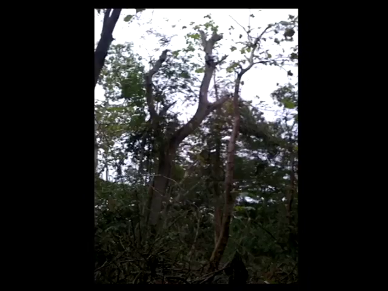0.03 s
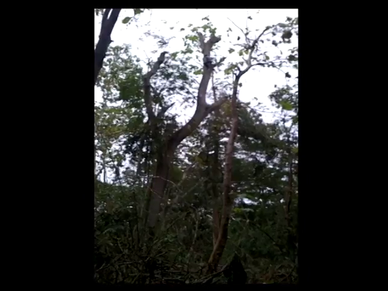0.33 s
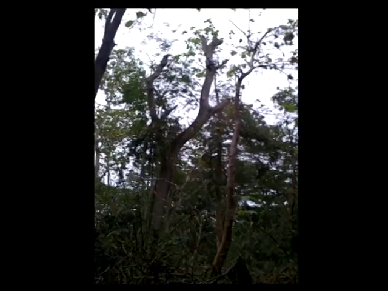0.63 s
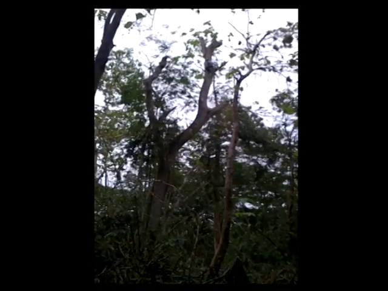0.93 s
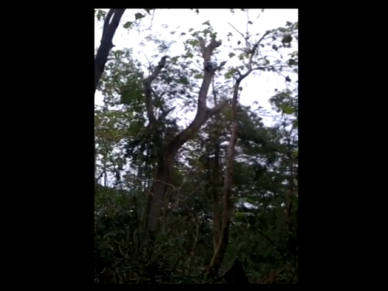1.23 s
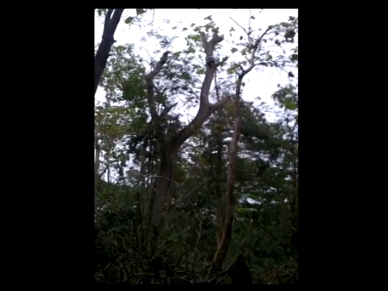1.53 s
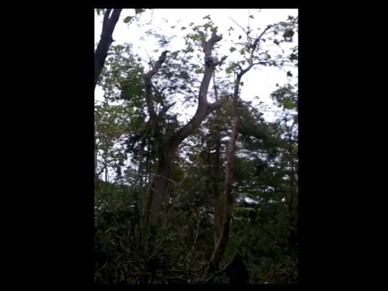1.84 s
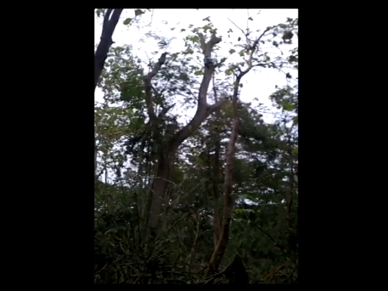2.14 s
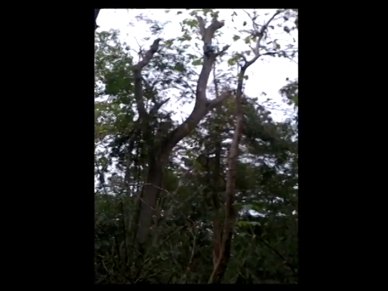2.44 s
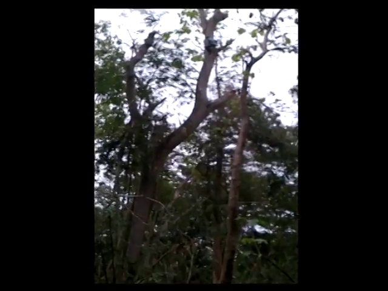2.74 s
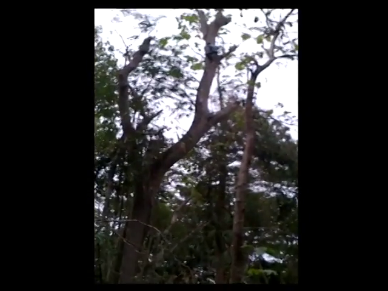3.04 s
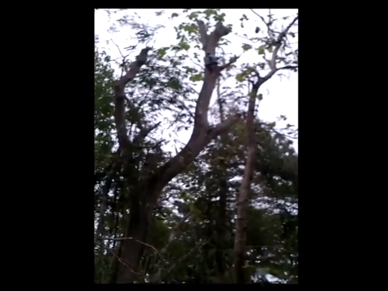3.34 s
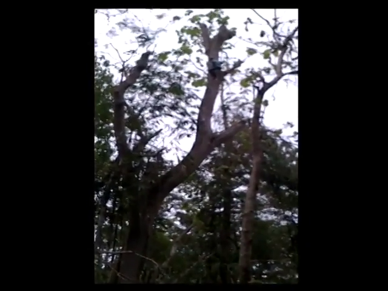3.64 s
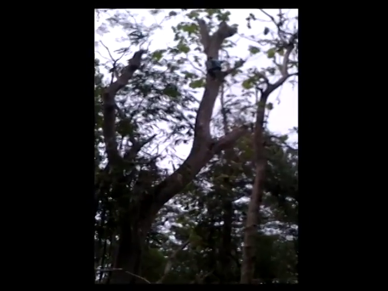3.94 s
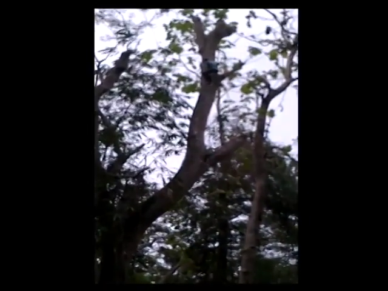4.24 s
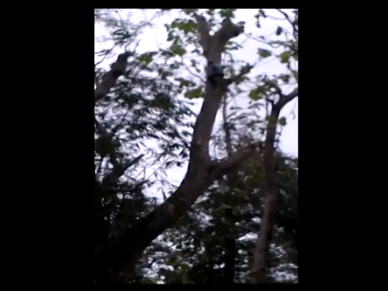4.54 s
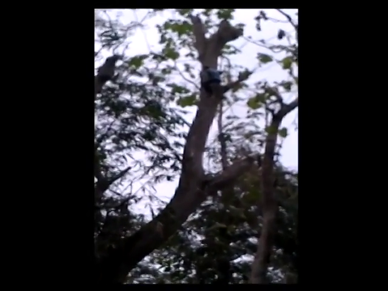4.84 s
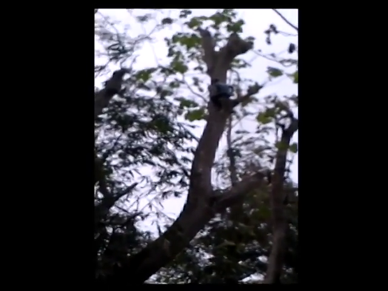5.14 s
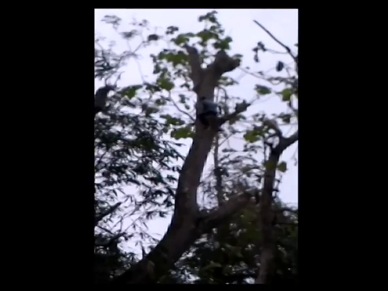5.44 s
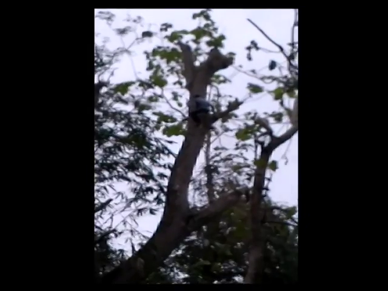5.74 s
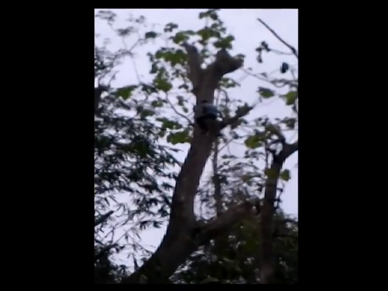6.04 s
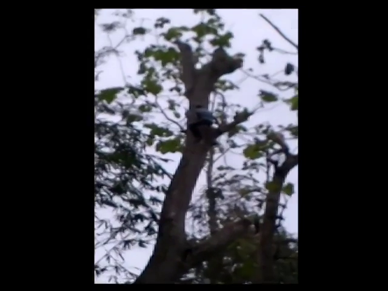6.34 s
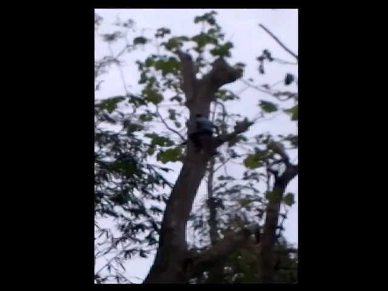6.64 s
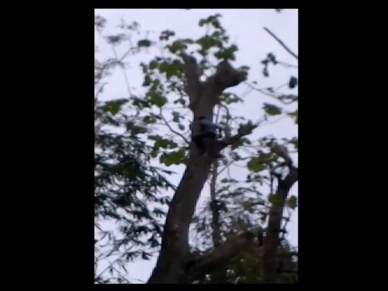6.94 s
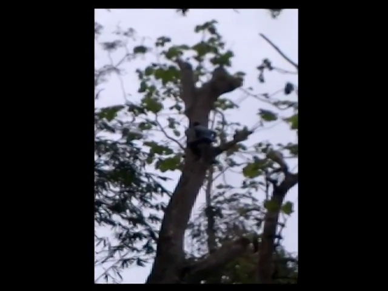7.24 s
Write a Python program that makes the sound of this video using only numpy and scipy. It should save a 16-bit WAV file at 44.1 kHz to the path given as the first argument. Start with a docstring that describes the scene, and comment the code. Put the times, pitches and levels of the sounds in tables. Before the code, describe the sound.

A two-stroke chainsaw works on a high limb, heard from the ground among tall trees. It starts suddenly with a bright buzz that rises in pitch. As the chain bites, the roar dies away and the engine sinks to a duller, wavering drone. It then gradually regains speed, with a thin whine and the hiss of the chain in the wood. The trunks add a short, soft echo.

```python
"""Chainsaw up in a tree

A two-stroke chainsaw cuts a high limb, heard from the ground among tall trees. It buzzes brightly
at full throttle, bogs down to a dull drone as the chain bites, then slowly regains speed. Every
firing barks through the muffler, the chain hisses in the cut, and trunks scatter the sound."""
import sys
import numpy as np
from scipy import signal
from scipy.fft import rfft, irfft, next_fast_len
from scipy.io import wavfile
from scipy.ndimage import uniform_filter1d, map_coordinates

SR = 44100
rng = np.random.default_rng(int(sys.argv[2]) if len(sys.argv) > 2 else 0)


def bounce(signal):
    """Save signal as a 16-bit WAV file at the path given by the first command-line argument."""
    frames = np.transpose(np.atleast_2d(signal))
    limited = np.clip(frames, -1, 1)
    pcm = np.round(limited * 32767).astype(np.int16)
    wavfile.write(sys.argv[1], SR, pcm)


N = 325899
TIME = np.arange(N) / SR


def amp(db):
    """Turn decibels into a number to multiply by."""
    return 10 ** (np.asarray(db) / 20)


def unit(x):
    """Scale x to an average power of 1."""
    return x / np.sqrt(np.mean(x ** 2) + 1e-20)


def levelled(x, size=3500):
    """Even out x so that its power stays near 1."""
    power = uniform_filter1d(uniform_filter1d(x ** 2, size), size)
    return x / np.sqrt(np.abs(power) + 1e-12)


def along(points, hz):
    """Look up a table by frequency, with octaves evenly spaced."""
    f, v = np.transpose(points)
    return np.interp(np.log(hz + 1), np.log(f + 1), v)


def curve(points):
    """Join a table's points in time, giving one value per sample."""
    return np.interp(TIME, *np.transpose(points))


def chance(clock):
    """A smooth random curve with a new value at every whole step of the clock."""
    return map_coordinates(rng.standard_normal(4096), [clock], mode="mirror")


def filtered(x, response):
    """Multiply each frequency in x by response(hz)."""
    size = next_fast_len(N + SR // 2)
    hz = np.fft.rfftfreq(size, 1 / SR)
    return irfft(rfft(x, size) * response(hz), size)[:N]


def coloured(x, spectrum):
    """Give x the tone colour in a table, at power 1."""
    return unit(filtered(x, lambda hz: amp(along(spectrum, hz))))


def peak(hz, centre, width):
    """How well hz fits a resonance, a pitch at which a part likes to ring: 1 at best."""
    return 1 / (1 + (2 * (hz - centre) / width) ** 2)


def gas(turns, depth):
    """Rushing noise that swells each time the exhaust port opens."""
    return unit(rng.standard_normal(N) * np.exp(depth * np.cos(2 * np.pi * turns)))


def firings(turns, jitter, scatter_db, count=34):
    """One sharp pulse per engine turn, without its bass, each a little off in time and size."""
    phase = 2 * np.pi * (turns + jitter * chance(turns))
    pulses = sum(np.cos(k * phase) for k in range(5, count))
    return unit(pulses * amp(scatter_db * chance(turns)))


# tone colour of the moving air: f/Hz, level/dB
AIR_COLOUR = [(20, -21), (40, -1), (70, 5), (110, 1), (250, 3), (500, 1.5), (900, 2), (1500, -13),
              (4000, -34)]
def air(revs):
    """A soft rush of air lies under the engine and grows with its speed."""
    level_db = -48.5 + 2 * chance(TIME * 5)
    return np.sqrt(revs) * amp(level_db) * coloured(rng.standard_normal(N), AIR_COLOUR)


# time the forest's echo takes to fade by 60 dB: f/Hz, t/s
ECHO_FADE = [(150, .25), (1000, 0.42), (4000, 0.52), (12000, 0.16)]
def among_trees(x, wet_db):
    """Trunks and leaves add a soft echo, wet_db louder than x; the mix has power 1."""
    hz, t, noise = signal.stft(rng.standard_normal(SR // 2), SR, nperseg=256)
    fade = amp(-60 * t / along(ECHO_FADE, hz)[:, None])
    _, tail = signal.istft(noise * fade, SR, nperseg=256)
    echo = signal.fftconvolve(x, np.pad(tail, (SR // 200, 0)))[:N]  # 5 ms late
    return unit(unit(x) + amp(wet_db) * unit(echo))


def off_limbs(x, echo_db, count=8):
    """Quick, weak echoes from nearby limbs make a hiss metallic."""
    delays = rng.integers(SR // 1000, SR // 80, count)
    return unit(x + amp(echo_db) * sum(np.roll(x, d) for d in delays))


# loudness of the running chain: t/s, level/dB
SIZZLE_LEVEL = [(0.6, -45), (1.8, -38.5), (2.5, -42.5), (3.7, -47), (4.75, -44), (5.4, -48.5),
                (6.65, -41.5), (7.39, -45)]
# its tone colour: f/Hz, level/dB
SIZZLE_COLOUR = [(1500, -9.5), (3400, -5), (4700, -8.5), (6000, -0.5), (7300, 2), (8500, -3.5),
                 (10200, -8.5), (11400, -10), (12600, -17.5), (14200, -28)]
def chain_sizzle(turns):
    """The links sizzle as they run round the bar, brighter when louder."""
    level_db = curve(SIZZLE_LEVEL)
    sizzle = coloured(gas(turns, depth=0.07) * amp(0.78 * chance(TIME * 200)), SIZZLE_COLOUR)
    treble = filtered(sizzle, lambda hz: np.interp(hz, [8500, 10500], [0, 1]))
    treble_db = 0.83 * (level_db - level_db.mean())
    sizzle += treble * (amp(treble_db) - 1)
    return amp(level_db) * off_limbs(sizzle, echo_db=-21.5)


# how the hiss of the cut rises and falls: t/s, level/dB
CUT_LEVEL = [(2.1, -32.5), (2.5, -55), (3.7, -54.5), (4.65, -43.5), (5.55, -45.5), (6.6, -39), (7.39, -43)]
# its tone colour: f/Hz, level/dB
CUT_COLOUR = [(1500, -5), (3200, -21.5), (3650, -15.5), (3900, -0.5), (4700, -1.5), (5300, -4), (5900, -1),
              (6500, -1), (7200, -24.5), (9000, -16), (14000, -52)]
def wood_cut(turns):
    """The chain's teeth tear the wood in time with the engine."""
    fade_in = np.interp(TIME, [2.0, 2.5], [0, 1])
    teeth = among_trees(firings(turns, jitter=0.0018, scatter_db=6.5, count=42), wet_db=24)
    hiss = gas(turns, depth=0.07) * amp(1.5 * chance(TIME * 250))
    cut = coloured(hiss + amp(-14.5) * teeth, CUT_COLOUR)
    return fade_in * amp(curve(CUT_LEVEL) + 1.5) * off_limbs(cut, echo_db=-17)


# tone colour of the opening roar: f/Hz, level/dB
ROAR_COLOUR = [(900, -12), (1600, -3), (2500, -1), (3600, 0.5), (4200, 2.5), (4700, 1), (6500, 1.5),
               (7000, -5), (8000, -15), (14000, -49)]
def throttle_roar(turns, revs, bite_s=1.92, fall_db_per_s=86):
    """At full throttle the saw roars, louder when faster; the roar dies once the chain bites."""
    level_db = -31.5 + 5.5 * np.log2(revs) - fall_db_per_s * np.maximum(TIME - bite_s, 0)
    roar = coloured(gas(turns, depth=0.068) * amp(0.21 * chance(TIME * 250)), ROAR_COLOUR)
    return amp(level_db) * off_limbs(roar, echo_db=-19)


# brief tones (harmonic k is a tone at k times the engine's speed):
# middle t/s, harmonic number, top level/dB, rise or fall t/s
FLARE_TONES = [(0.72, 7, -31.5, 0.48), (1.22, 9, -35.5, 0.37), (1.499, 9, -31, 0.11),
               (1.764, 21, -34, 0.16), (1.798, 14, -38, 0.19), (2.347, 6, -36, 0.16),
               (2.93, 6, -36.5, 0.17), (2.99, 14, -52, 0.3), (3.255, 10, -40, 0.17), (3.64, 7, -30, .22),
               (4.0, 14, -46, .2), (4.183, 9, -37, .07), (4.67, 12, -45, .38), (5.229, 9, -34.5, 0.2),
               (5.491, 9, -37.5, .2), (6.34, 10, -41, 0.22), (7.08, 9, -34.5, .18)]
def flares(turns):
    """Further single harmonics sing out like the casing whine, swelling briefly and fading."""
    sound = np.zeros(N)
    for middle_s, harmonic, db, rise_s in FLARE_TONES:
        near = np.abs(TIME - middle_s) < rise_s
        swell = np.cos(np.pi / 2 * (TIME[near] - middle_s) / rise_s) ** 2
        phase = 2 * np.pi * harmonic * turns[near] + 0.65 * chance(TIME[near] * 25)
        sound[near] += amp(db) * swell * np.cos(phase)
    return sound


# resonances of the saw's casing: f/Hz, width/Hz, level/dB
CASING_PEAKS = [(1110, 21, -8), (1630, 35, -9.5), (1750, 40, -11), (1903, 24, -12), (2112, 25, -13),
                (2741, 39, -10.5), (4100, 16, -8)]
# how the whine, and the exhaust's rasp below, rise and fall: t/s, level/dB
WHINE_AND_RASP_LEVEL = [(0.6, -34.5), (1.4, -30), (1.92, -28.5), (2.04, -37), (2.56, -47), (3.75, -49.5),
                        (4, -43), (4.3, -39.5), (5.55, -38), (6.24, -36.5), (6.6, -31), (7.39, -33)]
def casing_whine(turns, speed_hz):
    """A high harmonic sings out as it slides across a casing resonance, blurred by the trees."""
    sound = np.zeros(N)
    for k in range(7, 24):
        gain = sum(amp(db) * peak(k * speed_hz, hz, width) for hz, width, db in CASING_PEAKS)
        sound += gain * np.sin(2 * np.pi * k * turns + 0.67 * chance(TIME * 22))
    return amp(curve(WHINE_AND_RASP_LEVEL)) * sound


# tone colour of the exhaust's rasp: f/Hz, level/dB
RASP_COLOUR = [(1000, -34), (1450, 2), (1560, 6), (1700, 7.5), (1800, 4), (2100, 7), (2300, 1), (2720, 4),
               (2870, -2), (3050, 0.5), (3400, -7), (4500, -23), (8000, -53)]
def exhaust_rasp(turns, pulses):
    """The highest part of the exhaust is more rushing gas than firing pulses."""
    flow = among_trees(pulses, wet_db=15) + amp(3) * gas(turns, depth=0.17)
    return amp(curve(WHINE_AND_RASP_LEVEL) - 4.5) * levelled(coloured(flow, RASP_COLOUR))


def ring(x, peaks, band_hz):
    """Let x ring a set of resonances, trim it to a band and even out its loudness."""
    def response(f):
        return sum((-1) ** k * amp(db) * 1j * f * width / (hz * hz - f * f + 1j * f * width)
                   for k, (hz, width, db) in enumerate(peaks))
    band = signal.butter(3, band_hz, "band", fs=SR, output="sos")
    return levelled(signal.sosfilt(band, filtered(x, response)))


def in_tune(speed_hz, peaks):
    """How strongly harmonics 5 to 12 meet the resonances, in dB."""
    speeds = np.linspace(speed_hz.min(), speed_hz.max(), 256)
    power = sum(amp(db) ** 2 * peak(k * speeds, hz, width)
                for k in range(5, 13) for hz, width, db in peaks)
    return np.interp(speed_hz, speeds, 10 * np.log10(power))


# resonances of the muffler's can and of its outlet: f/Hz, width/Hz, level/dB
CAN_PEAKS = [(575.5, 117, 3.5), (707, 45, 10), (785.5, 59, 6.5), (894, 165, -10.5)]
OUTLET_PEAKS = [(975, 120, 0.5), (1107, 44, -1.5), (1211, 102, -3.5), (1357, 43, -14.5)]
# how the can's bark and the outlet's snarl rise and fall: t/s, level/dB
CAN_LEVEL = [(0.6, -30), (1.45, -30), (1.8, -39), (2.56, -34.5), (2.9, -34.5), (3.35, -32), (3.56, -26.5),
             (4.1, -27), (4.3, -32.5), (4.7, -38), (5.09, -34), (5.22, -50), (5.43, -33.5), (5.8, -30),
             (6.35, -33.5), (7.1, -54), (7.33, -28.5)]
OUTLET_LEVEL = [(0.6, -30), (1.9, -23), (2, -31.5), (2.23, -37), (2.31, -34.5), (2.44, -46), (2.7, -38),
                (3.02, -51), (3.25, -39), (3.6, -45.5), (4.08, -42), (4.17, -38), (4.3, -39.5),
                (4.86, -33.5), (4.98, -41.5), (5.2, -35), (5.8, -29.5), (7.39, -29.5)]
def muffler(turns, revs, speed_hz, pulses):
    """Firings and gas ring the muffler, louder when a harmonic meets a resonance."""
    waver_db = lambda: 1.5 * chance(TIME * 14)  # random swells and sags as the load shifts
    bark_db = curve(CAN_LEVEL) + 0.17 * in_tune(speed_hz, CAN_PEAKS) + waver_db()
    snarl_db = curve(OUTLET_LEVEL) + 0.24 * in_tune(speed_hz, OUTLET_PEAKS) + waver_db()
    rush = revs * gas(turns, depth=0.23)
    bark = ring(among_trees(pulses, wet_db=0) + amp(-23) * rush, CAN_PEAKS, band_hz=(540, 900))
    snarl = ring(among_trees(pulses, wet_db=5.5) + amp(-11.5) * rush, OUTLET_PEAKS, band_hz=(910, 1410))
    return amp(bark_db - 4.5) * bark + amp(snarl_db - 5) * snarl


# how well the muffler and surroundings pass each low pitch: f/Hz, level/dB
DRONE_COLOUR = [(116.0, -44), (124.0, -45.5), (128.0, -33), (134.0, -46.5), (139.0, -33.5), (148.0, -46),
                (159.0, -31.5), (171.0, -41.5), (188.0, -33.5), (198.0, -37), (228.0, -41.5),
                (285.0, -24.5), (340.0, -31.5), (360.0, -33.0), (385.0, -28.5), (415.0, -37.5),
                (440.0, -52), (535.0, -44.5), (575.0, -45.5), (610.0, -53), (680.0, -41), (725.0, -47),
                (780.0, -35)]
# strength of the four lowest harmonics before that colouring: t/s, level/dB
HARMONIC_1 = [(0.6, 3.5), (1.85, -1.5), (2.12, -15), (2.42, 1), (2.95, -3), (3.4, 8.5), (4.1, 10),
              (4.3, -2), (6.3, 0.5), (6.6, 3.5), (7.39, 3.5)]
HARMONIC_2 = [(0.6, -2.7), (1.9, -2), (2.08, -13.5), (2.3, -4), (5.4, -3.7), (6.1, -6), (7.39, -3)]
HARMONIC_3 = [(0.6, 11), (1, -2), (1.3, 9.5), (1.9, 10.5), (2.55, -1), (4.1, -0.7), (4.3, -5), (4.9, -3.5),
              (6.1, 12.5), (7.39, 14)]
HARMONIC_4 = [(0.6, 11), (4.1, -8.7), (4.3, 5), (5.7, 6), (6.1, -6), (7.2, 6.5), (7.39, -10)]
def drone(turns, revs, speed_hz):
    """Four low tones swell and fade as they slide over resonances; tree echoes make them waver."""
    sound = np.zeros(N)
    for k, levels in enumerate([HARMONIC_1, HARMONIC_2, HARMONIC_3, HARMONIC_4], 1):
        flutter_db = revs * (0.5 * chance(turns) + 1.2 * chance(TIME * 22))
        direct = amp(curve(levels) + along(DRONE_COLOUR, k * speed_hz) + flutter_db)
        drift = chance(TIME * 32) + 1j * chance(TIME * 32)  # random in both size and phase
        scattered = amp(-46) * revs ** 2 * drift / k
        phase = 2 * np.pi * k * turns - 0.886 * k * k
        sound += np.sqrt(2) * np.real((direct + scattered) * np.exp(1j * phase))
    return sound


# engine speed in turns a second, with one firing a turn: t/s, f/Hz
ENGINE_SPEED = [(0.6, 150.0), (0.81, 154.8), (0.98, 154.5), (1.26, 177.5), (1.55, 187.4), (1.62, 194.2),
                (1.71, 197.7), (1.88, 194.7), (2.26, 172), (2.38, 162.4), (2.47, 147.4), (2.55, 148.7),
                (2.75, 137), (2.81, 130.3), (2.91, 126.1), (3.32, 122.4), (3.44, 118.1), (3.59, 112.5),
                (3.83, 115.8), (4.1, 115.2), (4.29, 127.6), (4.32, 126.4), (4.53, 135.1), (4.82, 132.1),
                (4.95, 126.1), (5.01, 125.7), (5.16, 143.3), (5.2, 146.2), (5.33, 150.1), (5.52, 152),
                (5.71, 162.6), (5.97, 168.3), (6.25, 177.9), (6.4, 179.8), (6.61, 192.8), (6.71, 189.6),
                (6.8, 184.4), (6.91, 189.6), (7.1, 193.2), (7.18, 190.6), (7.29, 179.2), (7.39, 174.5)]
def scene():
    """One turning engine drives every part of the saw; left and right are alike."""
    speed_hz = curve(ENGINE_SPEED)
    revs = speed_hz / speed_hz.mean()  # 1 at average speed
    wobble = 1 + 0.0013 * chance(TIME * 30)
    turns = np.cumsum(speed_hz * wobble) / SR  # turns made so far
    engine = drone(turns, revs, speed_hz)
    pulses = firings(turns, jitter=0.0015, scatter_db=0.5)
    engine += muffler(turns, revs, speed_hz, pulses) + exhaust_rasp(turns, pulses)
    engine += casing_whine(turns, speed_hz) + flares(turns) + throttle_roar(turns, revs)
    chain = wood_cut(turns) + chain_sizzle(turns)
    return np.tile(air(revs) + chain + engine, (2, 1))


def record(dry):
    """The sound starts suddenly after a short silence, with its very highest treble cut off."""
    start_s, top_hz = 0.593, 14200
    fade_in = np.clip((TIME - start_s) / 0.002, 0, 1)
    return np.array([filtered(x * fade_in, lambda hz: hz < top_hz) for x in dry])


dry = scene()
out = record(dry)
bounce(out)
```